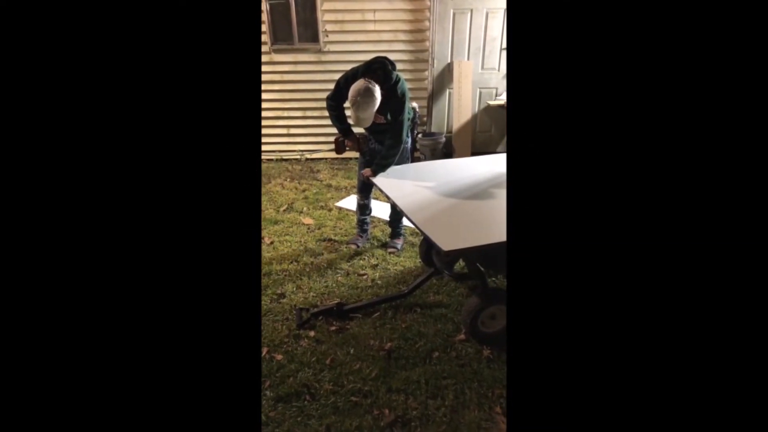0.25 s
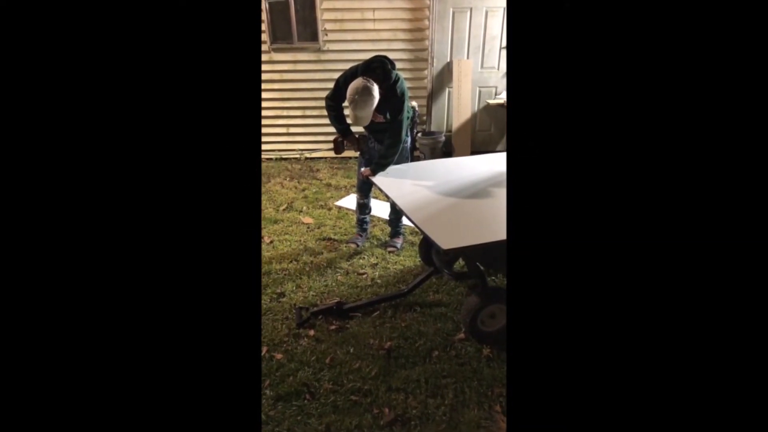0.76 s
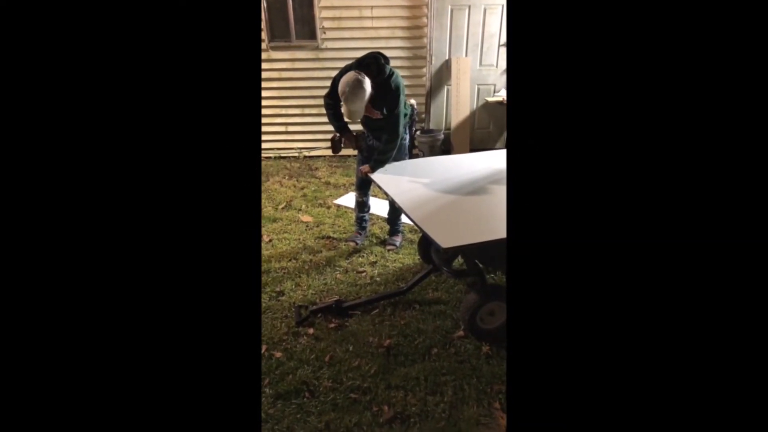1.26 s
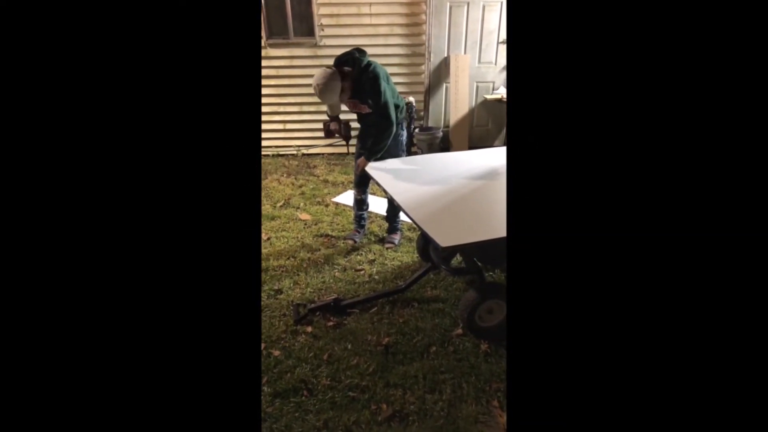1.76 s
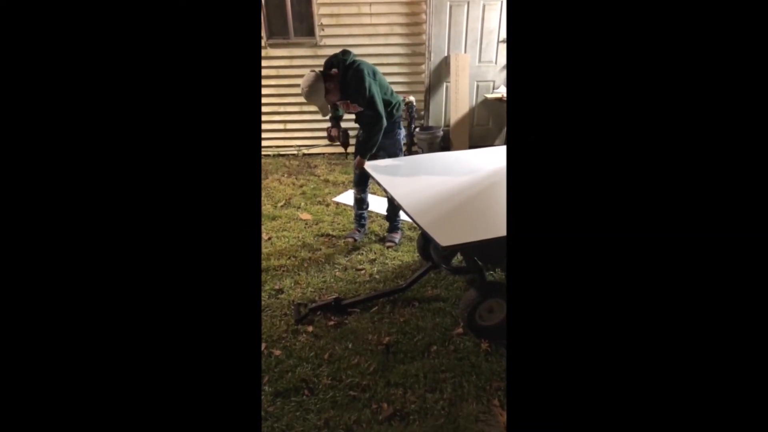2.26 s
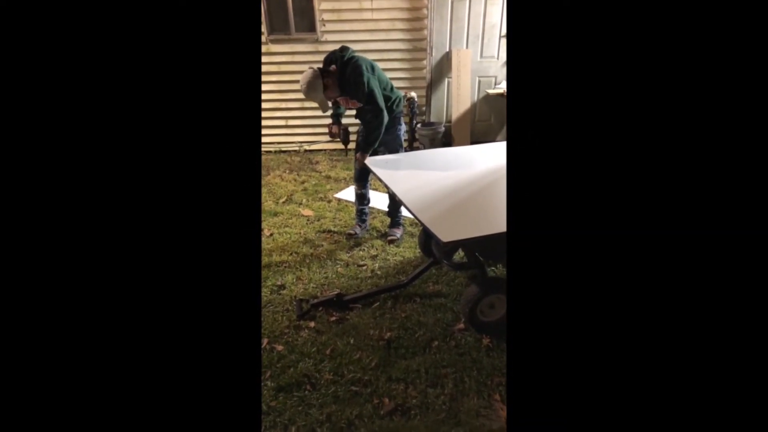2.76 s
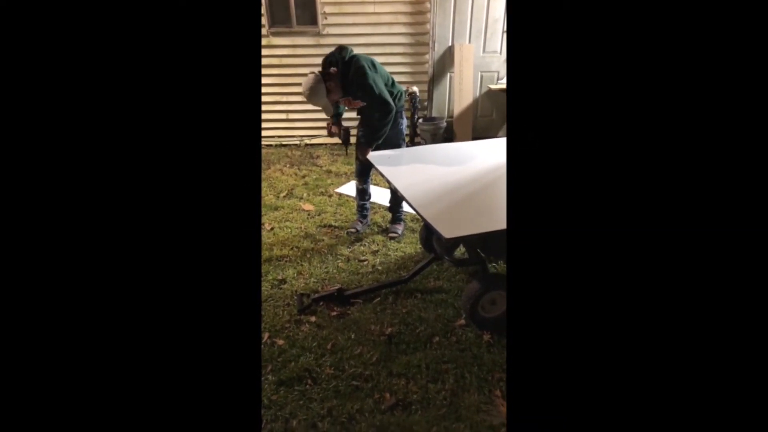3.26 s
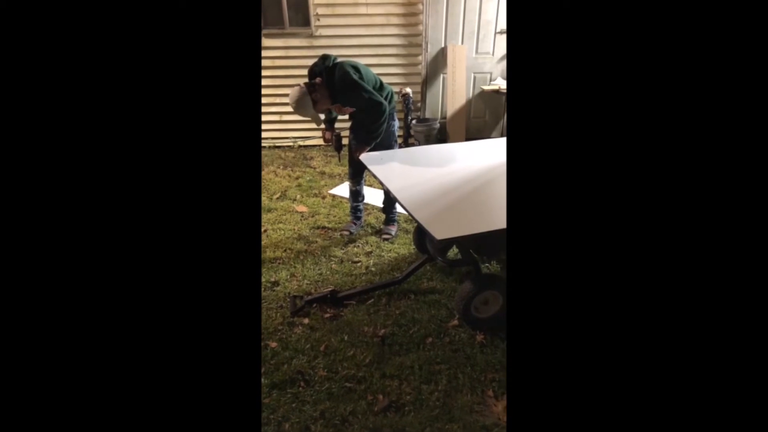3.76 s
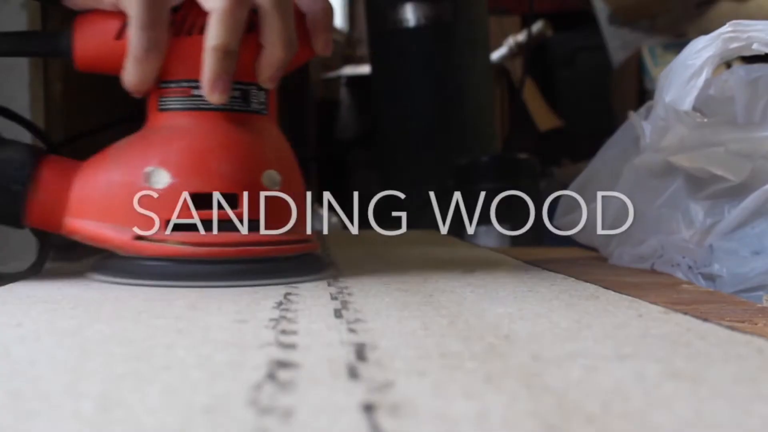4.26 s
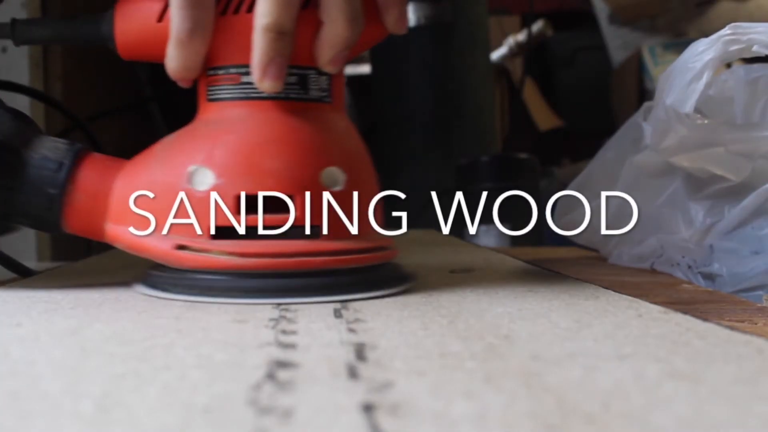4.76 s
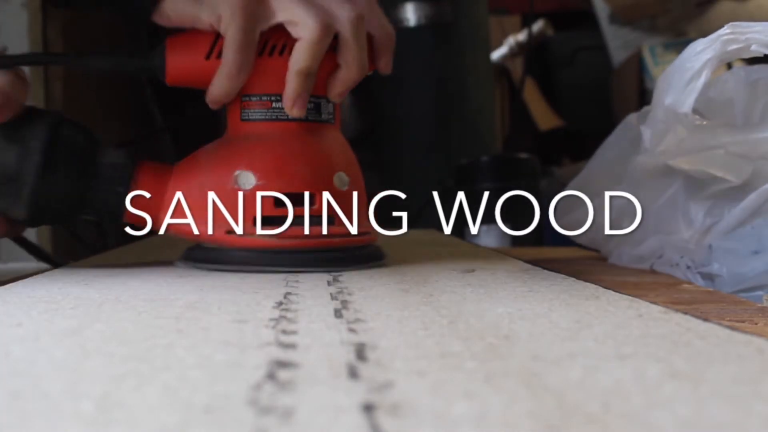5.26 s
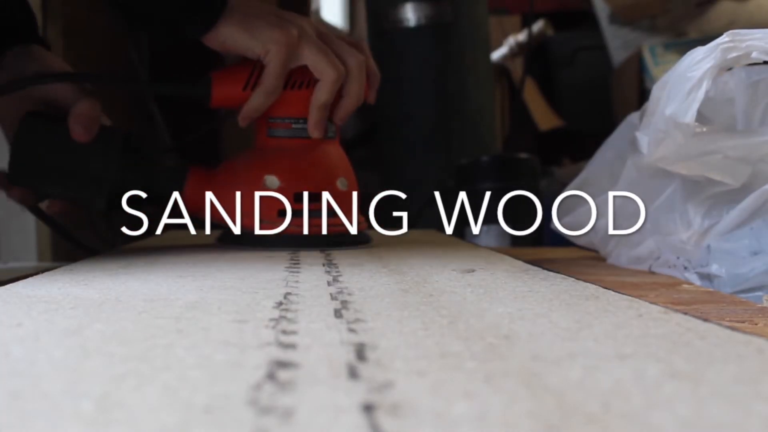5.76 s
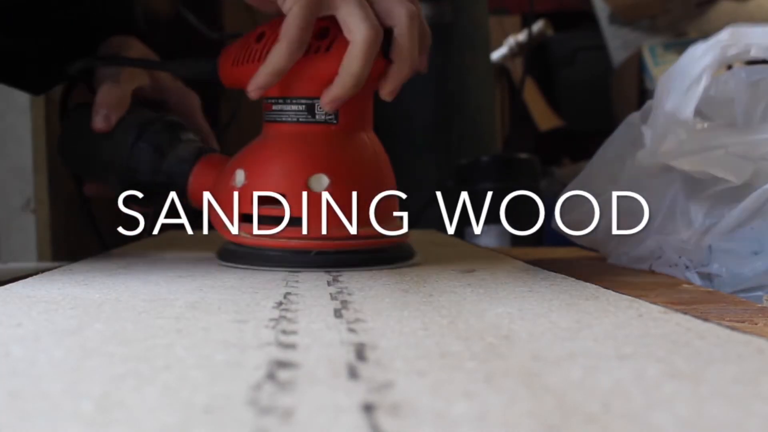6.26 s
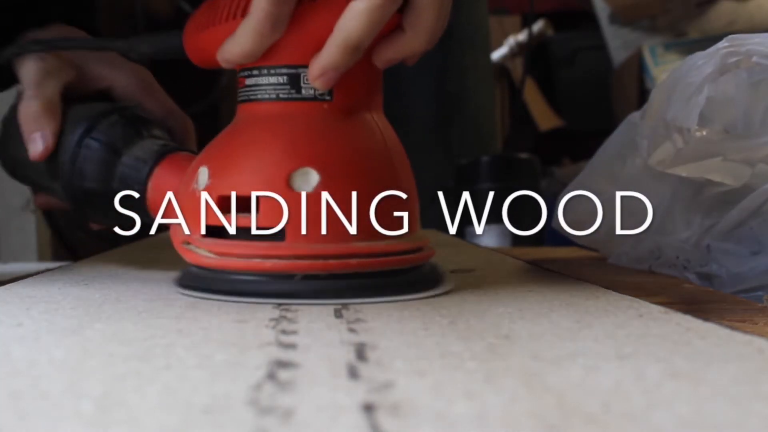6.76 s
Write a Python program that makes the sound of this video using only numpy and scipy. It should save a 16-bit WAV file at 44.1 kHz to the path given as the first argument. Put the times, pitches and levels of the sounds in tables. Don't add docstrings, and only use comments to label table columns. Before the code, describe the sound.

An impact driver whines up in a quiet yard, hammers a screw into a booming panel, stops; later a sander drones loudly up close.

```python
import sys
import numpy as np
from scipy import signal
from scipy.fft import rfft, irfft, next_fast_len
from scipy.io import wavfile
from scipy.ndimage import uniform_filter1d, map_coordinates

SR = 44100
rng = np.random.default_rng(int(sys.argv[2]) if len(sys.argv) > 2 else 0)


def output_pcm(signal):
    pcm = np.clip(np.atleast_2d(signal).T, -1, 1) * 32767
    wavfile.write(sys.argv[1], SR, np.round(pcm).astype(np.int16))


def ratio(d):
    e = np.asarray(d, float) / 20
    return 10 ** e


N = 308685
T = np.arange(N) / SR
CUT_S = 4.2415
# t/s, reach away from the microphone/0-1, turned to pull back/0-1, pressure/dB
STROKE = [(4.25, 0.05, 0, -0.5), (4.5, 0, 0, 2), (4.65, 0.33, 0, 1.5), (4.9, 0.18, 0.16, 0),
          (5.2, 0.35, 0, -1.5), (5.4, 0.37, 0.24, 2), (5.6, 0.63, 0.87, 0.2), (5.85, 0.92, 0.64, 2.5),
          (6.1, 0.94, 0.7, 0.6), (6.4, 0.48, 0.82, 1.5), (6.6, 0.5, 0.53, 1.5), (6.8, 0.54, 1, 0.5),
          (6.99, 0.57, 0.4, 0)]


def unit(x):
    return x / np.sqrt(np.mean(x ** 2) + 1e-20)


def bell(x):
    return np.exp(-.5 * x ** 2)


def along(points, hz):
    f, v = np.transpose(points)
    return np.interp(np.log(hz + 1), np.log(f + 1), v)


def curves(rows):
    s, *cols = np.transpose(rows)
    return [np.interp(T, s, c) for c in cols]


def moments(rows):
    return sum(db * bell((T - s) / width) for s, db, width in rows)


def law(near_db, reach_db, pull_db):
    reach, pull, _ = curves(STROKE)
    return near_db + reach_db * reach + pull_db * pull


def wobble(rate):
    return map_coordinates(rng.standard_normal(int(N * rate / SR) + 4), [T * rate])


def tone(turns, db):
    return np.sqrt(2) * ratio(db) * np.sin(2 * np.pi * turns)


def filtered(x, response):
    m = next_fast_len(N + SR // 2)
    return irfft(rfft(x, m) * response(np.fft.rfftfreq(m, 1 / SR)), m)[:N]


def resonances(modes):
    return lambda f: sum((-1) ** k * ratio(db) * 1j * f * w / (c * c - f * f + 1j * f * w)
                         for k, (c, w, db) in enumerate(modes))


def rush(spectrum, patchy_db):
    z = signal.stft(rng.standard_normal(N), nperseg=512)[2]
    field = uniform_filter1d(rng.standard_normal(z.shape), size=8, axis=0)
    field = uniform_filter1d(field, size=8, axis=1)
    x = signal.istft(z * ratio(patchy_db * unit(field)), nperseg=512)[1][:N]
    return unit(filtered(x, lambda hz: ratio(along(spectrum, hz))))


def dying(spectrum, t60, size):
    hz, t, z = signal.stft(rng.standard_normal(size), SR, nperseg=128)
    level_db = along(spectrum, hz)[:, None] - 60 * t / along(t60, hz)[:, None]
    x = signal.istft(z * ratio(level_db), SR, nperseg=128)[1]
    return x / np.linalg.norm(x)


def add(track, s, x):
    part = track[round(s * SR):][:len(x)]
    part += x[:len(part)]


def driving():
    # f/Hz, width/Hz, level/dB
    housing = [(1690, 140, -4.5), (3350, 360, -1), (5000, 302, 13.5), (5490, 300, 6), (9500, 1500, 2)]
    # f/Hz, level/dB
    whirr = [(60, -20.5), (130, -1.5), (330, -6.5), (550, -14), (780, -6), (1100, -13), (1500, -4.5),
             (1900, -9.5), (2400, -11), (4500, -9), (6500, -11), (9500, -11), (12000, -17), (16000, -10)]
    load_db = [-6, 6, -0.5]
    free_hz, sag_hz = 1730, 667
    trigger_s, spin_up_s, seated_s, sag_s = .46, 0.071, 0.97, .064
    late_db = -24
    teeth = 27.2

    t = np.clip(T, trigger_s - .03, seated_s + 0.022)
    late = np.exp((trigger_s - t) / spin_up_s)
    load = np.exp((t - seated_s) / sag_s)
    hz = free_hz * (1 - 0.6 * late) - sag_hz * load
    turns = np.cumsum(hz * (1 + 0.0033 * wobble(120))) / SR
    mesh_db = [db + late_db * late + gain * load for db, gain in zip([-57, -58.5, -56.5], load_db)]
    noise_db = -42 - 5.5 * late
    knock = np.exp(-(turns / teeth % 1) / 0.301)

    whine = np.zeros(N)
    for k, steady in enumerate((.45, .07, .25)):
        overtone_hz = (k + 1) * hz
        lift_db = 3.5 * sum(1 / (1 + ((overtone_hz - c) / w) ** 2) for c, w, _ in housing) + 0.5
        phase = (k + 1) * turns + (0.09 + .04 * k) * wobble(150)
        whine += tone(phase, mesh_db[k] + lift_db + 1.5 * wobble(27)) * unit(steady + knock)
    whine += tone(turns, mesh_db[0] - 10.5 + 3 * wobble(32.1))
    whine += tone(0.8 * turns, mesh_db[0] - 7.0 + 3 * wobble(30))
    whine += tone(turns / teeth + .1 * np.sin(40 * T), -60.5 + 3 * wobble(14))
    whistle_db = -55 + .6 * late_db * late - 22 * np.exp((t - seated_s) / .05)
    whine += tone(4.85 * np.cumsum(hz) / SR, whistle_db + 1.1 * wobble(40))

    rattling = unit(filtered(knock ** 2 * rng.standard_normal(N), resonances(housing)))
    noise = ratio(noise_db - 1.5) * rush(whirr, patchy_db=2.0) + ratio(noise_db - 12.0 + 5 * load) * rattling
    return (whine + noise) * np.interp(T, [.43, .465, .978, .995], [0, 1, 1, 0])


def panel_shaking():
    # t/s, level/dB
    effort = [
        (.965, -26),
        (.985, -5.5),
        (1.04, -4),
        (1.1, -0.5),
        (1.125, -7),
        (1.16, -3),
        (1.19, -22.5),
        (1.25, -35),
        (1.4, -46),
    ]
    # f/Hz, level/dB
    panel = [(90, -29.5), (130, -11), (185, 5.5), (245, -18), (310, -1), (400, -9.5), (560, -16),
             (800, -10.5), (1100, -15.5), (1400, -14), (2000, -21.5), (3500, -22.5), (7000, -67)]
    # f/Hz, level/dB
    rattle = [(900, -20.5), (1500, -5), (3000, -3), (5000, -6), (7000, -11.5), (10000, -11.5), (13000, -16),
              (16000, -19.5)]
    # f/Hz, width/Hz, level/dB
    panel_modes = [(183, 24, -1), (309, 28, -0.5)]
    boom_hz, boom_t60 = 77, 0.24

    effort_db, = curves(effort)
    started = T > effort[0][0]
    loose = ratio(-40.5 + 2.5 + 0.195 * effort_db) * rush(rattle, patchy_db=3.0)
    x = ratio(-24.5 + effort_db) * rush(panel, patchy_db=-1.5)
    x += loose * np.interp(T, [.966, .985, 1.15, 1.175], [0, 1, 1, 0])
    x *= np.interp(T, [.968, .982, 1.4, 1.5], [0, 1, 1, 0])
    push = tone(boom_hz * T, -23.5 + 1.85 * effort_db) * started
    x += filtered(push, resonances([(boom_hz, np.log(1000) / np.pi / boom_t60, 0)]))
    shake = ratio(-25 + 19.5 + effort_db) * rng.standard_normal(N) * started * (T < effort[-1][0])
    return x + filtered(shake, resonances(panel_modes))


def hammering():
    # t/s, peak level/dB, panel level/dB
    blows = [
        (0.9877, -14, -12.5),
        (1.0136, -14.5, -14.5),
        (1.0403, -13.5, -11.5),
        (1.067, -13, -13.5),
        (1.0948, -11.5, -11),
        (1.1306, -18, -3),
        (1.1462, -33.5, -7),
        (1.1607, -45, 3),
    ]
    # f/Hz, level/dB
    crack = [(2500, -28), (4500, -1.5), (8000, 1), (10000, 0.5), (12000, -5.5), (14000, -1), (16000, -19)]
    # f/Hz, level/dB
    strike = [(880, -23.5), (1500, -2), (2000, -11.5), (2300, -12), (2510, -7), (2720, -7.5), (4040, -11),
              (5070, -5.5), (6830, -22.5), (7760, -13.5), (12200, -22), (15100, -4.5), (16000, -22)]
    # f/Hz, t60/s
    steel_t60 = [(1500, 0.065), (5000, 0.032), (9000, 0.053), (15000, 0.02)]
    # f/Hz, level/dB
    thump = [(90, -29.5), (130, -11), (185, 5.5), (245, -18), (310, -1), (400, -9.5), (560, -16),
             (800, -10.5), (1100, -15.5), (1400, -14), (2000, -21.5), (3500, -22.5), (7000, -67)]

    x = panel_shaking()
    for s, db, panel_db in blows:
        ringing = dying(strike, steel_t60, size=4096)
        ringing *= 1 - np.exp(-np.arange(len(ringing)) / SR / .0006)
        rebound = dying(strike, steel_t60, size=4096)
        shaken = dying(thump, [(300, 0.033), (3000, 0.075)], size=8192)
        add(x, s + 0.0007, ratio(db + 7.5) * dying(crack, [(8000, 0.014)], size=1024))
        add(x, s + 0.00097, ratio(db + 15.0) * ringing)
        add(x, s + 0.0072, ratio(db + 6.0) * rebound)
        add(x, s + 0.00287, ratio(db + panel_db + 16.5) * shaken)
    t = np.arange(SR // 40) / SR
    for s, *_ in blows[1:5]:
        drift = 0.47 * np.cumsum(rng.standard_normal(len(t))) / 4
        swell = ratio(-20 - 60 * t / 0.015) * (1 - np.exp(-t / 0.0013))
        add(x, s - .0074, swell * np.sin(2 * np.pi * 5050 * t + drift))
    return x


def motor(turns):
    shaft_law = {1: (-18, -6.5, 0.1), 2: (-40.5, 3.6, 6.2), 3: (-37, 13.5, -12.5), 4: (-28.5, -10.5, -0.1),
                 12: (-32.5, 0.1, 4.7), 13: (-48, -1, 8.9)}
    order_swells = {2: [(4.9, 2.5, .1), (5.6, -1.5, 0.19), (5.98, 6, 0.012), (6.05, 4, 0.24),
                    (6.27, 4.5, 0.027), (6.65, 1, .06)], 3: [(4.3, 6, 0.058), (4.68, 2, .025),
                    (5.0, 6, .07), (5.4, -3, 0.13), (5.8, 0, .1), (6.15, 5, .1)], 4: [(4.27, 1.5, 0.044),
                    (4.82, 0, .1), (5.4, 4.5, 0.12), (5.7, 3.5, 0.091), (6.08, 4, 0.097), (6.75, 2, .1)]}
    # t/s, level/dB, half width/s
    shades = [(4.33, -6.5, 0.021), (4.38, 5, 0.012), (4.47, -4, 0.02), (4.6, -6, 0.052), (5.3, -7, 0.028),
              (5.455, -13, 0.018), (6.05, -28.5, 0.03), (6.16, -2.5, .05), (6.29, -2, 0.01),
              (6.58, 1.5, 0.012), (6.82, -13, 0.0059)]
    # t/s, level/dB, half width/s
    strain = [
        (4.97, 7.5, 0.26),
        (5.5, 8.5, 0.17),
        (5.83, 10, 0.081),
        (6.25, 13.5, 0.043),
        (6.47, 13, 0.065),
        (6.72, 11.5, 0.16),
    ]
    # t/s, level/dB, half width/s
    lower_fade = [
        (5.76, -15.5, 0.23),
        (4.4, 1, 0.032),
    ]

    db = {k: law(*row) + moments(order_swells.get(k, [])) for k, row in shaft_law.items()}
    bars_db = db[12] + moments(shades)
    upper_db = db[13] + moments(shades) + moments(strain)
    mains = 120 * T
    x = tone(turns, db[1] + .5 * wobble(25))
    x += tone(2 * turns, db[2] + 0.62 * wobble(6.9))
    x += tone(3 * turns, db[3] + 0.91 * wobble(16))
    x += tone(4 * turns, db[4] + 1.1 * wobble(20))
    x += tone(6 * turns, -46 + 0.74 * wobble(4.84))
    bars = 12 * turns + 0.022 * wobble(44)
    x += tone(bars, bars_db + 1.06 * wobble(30))
    x += tone(bars + mains, upper_db + 2.0 * wobble(25))
    x += tone(bars - mains, -41 + moments(lower_fade) + 2 * wobble(11))
    x += tone(2 * bars, bars_db - 22.5 + 2.3 * wobble(8.2))
    return x + tone(2 * bars - mains, bars_db - 22 + 2.8 * wobble(7.9))


def chatter(shaft, spin_hz):
    pad_law = {2: (-33.5, -1, 2.2), 3: (-26.5, -16.5, -6), 4: (-23, -14.5, 0.1), 6: (-39, 5, -0.81),
               8: (-39.5, 0.1, 0.1)}
    # overtone, level over the eighth/dB
    pad_top = [(9, -10.5), (11, -14), (12, -14.5), (14, -8.5), (15, -7), (18, -17), (23, -14.5), (26, -14)]
    # t/s, spins per order, spins more, spread/spins
    pad_lag = [(4.25, .9, .3, 1), (4.65, .9, .3, .9), (4.8, .85, .1, .6), (5.25, .85, 0, .6),
               (5.5, .9, -.3, .75), (5.9, 1.3, -3.7, 1), (6.15, 1.1, -1.5, .85), (6.45, .85, 0, .6),
               (6.7, .85, .1, .6), (6.99, .88, .1, .7)]
    strand_shift = {2: .6, 3: .05, 4: -.4, 6: .6}
    slap_start = {2: .11, 3: -.54, 4: -.71}
    own_bend = {2: .6, 3: -.06}
    # t/s, share, half width/s
    twin = [
        (4.8, .65, .3),
        (6.75, .35, .3),
    ]
    overtone_swells = {2: [(4.33, -8, .06), (4.65, 1, 0.039), (5.0, -3, .1), (5.5, -7, .12), (5.95, -9, 0.22),
                       (6.7, 0, .15)], 3: [(4.72, -5, .04), (5.1, 0.5, .2), (5.5, -2, 0.073), (6.5, -8, 0.22)],
                       4: [(4.9, 1, .15), (5.4, -3.5, .08), (5.65, -10, 0.16), (6.08, 1, 0.087), (6.77, 4.5, 0.084)],
                       5: [(4.73, -8, .05), (4.9, 6, .06), (5.47, 8.5, 0.046), (5.85, 3.5, 0.091), (6.2, 3, 0.056),
                       (6.63, -6, .06), (6.87, -4, .04), (6.98, 3, .03)]}
    # t/s, level/dB, half width/s
    rocks = [(4.7, 4, 0.057), (4.88, 1, 0.069), (5.05, -6, 0.017), (5.13, 4.5, 0.03), (5.27, 3.5, 0.046),
             (5.375, 8.5, 0.016), (5.45, -17, .04), (5.62, 0, .03), (5.8, 14, 0.03), (6.055, 13.5, 0.034),
             (6.13, 8, 0.01), (6.31, 6, 0.028), (6.4, -8, .03), (6.48, -1, .03), (6.55, 9.5, 0.024),
             (6.7, -3, 0.023), (6.79, 13, 0.023), (6.88, -10, 0.025)]
    # t/s, level/dB, half width/s
    grabs = [
        (4.675, 20.5, 0.015),
        (4.97, 6.5, 0.083),
        (5.27, 11, 0.029),
        (6.1, 14.5, 0.15),
        (6.78, 4, 0.092),
        (6.95, 20, 0.057),
    ]
    lag_share = .87
    skirt, skirt_wider = .2, 3.5

    loose_db = -15 * np.clip((4.5 + 0.19 - T) / 0.19, 0, 1)
    second_db, third_db, fourth_db, sixth_db, eighth_db = (law(*row) + loose_db for row in pad_law.values())
    flat_db, rock_db = moments(grabs), moments(rocks)
    eighth_db = eighth_db + rock_db
    low = {2: second_db, 3: third_db + flat_db, 4: fourth_db + 0.15 * flat_db, 5: sixth_db - 3.5,
           6: sixth_db, 7: eighth_db - 4.5, 8: eighth_db}
    spin = np.cumsum(spin_hz + 0.1547 * wobble(14)) / SR
    shop = T > CUT_S
    per_order, more, wide = (curve[shop] for curve in curves(pad_lag))

    x = np.zeros(N)
    for k, db in low.items():
        lag = np.arange(-3, k + 4)[:, None]
        off = (lag - (k * per_order + more + strand_shift.get(k, 0))) / wide
        share = bell(off) + skirt * bell(off / skirt_wider)
        if k == 4:
            share += moments(twin)[shop] * np.exp(-.5 * (off - 2 / wide) ** 2 * 3)
        share *= lag != 0
        start = slap_start.get(k, rng.random()) + own_bend.get(k, .21) * (lag - round(lag_share * k)) ** 2
        slipping = k * shaft + 0.021 * k * wobble(30)
        level_db = db + moments(overtone_swells.get(k, [])) + 1.5 * wobble(24)
        strands = tone(slipping[shop] - lag * spin[shop] + start, level_db[shop])
        x[shop] += (share * strands).sum(axis=0) / np.sqrt((share ** 2).sum(axis=0))

    order, over_db = np.transpose(pad_top)
    top_db = eighth_db - (1 - .45) * rock_db + 3.0
    for k in range(9, 27):
        slap = k * shaft - round(lag_share * k) * spin + 0.011 * k * wobble(30) + rng.random()
        swell = 1 + .3 * np.cos(2 * np.pi * (spin + rng.random()))
        x += tone(slap, top_db + np.interp(k, order, over_db) + 2.0 * wobble(24)) * swell
    return x


def sander():
    # t/s, shaft f/Hz, free spin of the pad f/Hz
    speed = [(4.25, 191.5, 2.6), (4.47, 185.2, 4.3), (4.72, 176.9, 4.75), (4.97, 172.9, 4.65),
             (5.22, 170.7, 4.6), (5.48, 169.4, 4.4), (5.72, 168.7, 4.05), (5.98, 168.5, 3.85),
             (6.22, 169.1, 3.9), (6.48, 170.2, 4.15), (6.72, 171.2, 4.3), (6.99, 171.7, 4.3)]
    noise_law = {"board": (-28.5, -1.05, -0.1), "grit": (-33.5, 1, 2.1), "fan": (-32.5, 1, 0.68)}
    # f/Hz, level/dB
    board = [(30, -80), (70, -55), (110, -33), (230, -13), (300, -6.5), (370, 2.5), (410, -0.5),
             (450, -1.5), (600, 2), (900, -4.5), (1500, -6.5), (1900, -19.5), (3000, -17.5), (5000, -71)]
    # f/Hz, level/dB
    grit = [(1060, -65), (1800, -5.5), (1930, -12), (1980, -2), (2090, -3), (2300, -3), (2980, -9),
            (6500, -14.5), (8450, -21), (14300, -120)]
    # f/Hz, level/dB
    fan = [(2650, -5), (4500, -4), (5330, -3.5), (8290, 0), (10300, -2.5), (12500, -11.5), (14400, -20.5),
           (15400, -30.5), (16000, -48)]
    # f/Hz, level/dB
    settle = [(30, -24), (70, 0.5), (110, -8), (200, 0), (300, -8), (420, -7), (600, -7), (1200, -37)]
    # t/s, peak level/dB
    bumps = [
        (4.29, -33),
        (4.529, -48),
        (4.609, -49.5),
        (5.39, -34),
        (5.989, -44),
        (6.488, -46),
        (6.839, -45),
        (6.979, -48),
    ]
    # t/s, peak level/dB, t60/s
    scuffs = [(4.2867, -21.5, .02), (4.298, -17, .02), (4.36, -20, 0.027), (4.4194, -16.5, 0.0177),
              (4.473, -16.5, 0.029), (4.517, -16, .035), (4.523, -17, .025), (4.593, -20, .04),
              (4.601, -17, 0.028), (4.7118, -17, .03), (6.3496, -22, .03), (6.475, -16.5, .03),
              (6.515, -20, .03), (6.6194, -22, .03)]

    hz, spin_hz = curves(speed)
    turns = np.cumsum(hz) / SR
    board_db, grit_db, fan_db = (law(*row) for row in noise_law.values())
    hand_db = curves(STROKE)[2]
    press = wobble(12)
    orbit = np.cos(2 * np.pi * turns) + 0.13 * np.cos(4 * np.pi * turns)

    board_db = board_db + 0.96 * hand_db + 0.35 * press + 0.45 * wobble(7.2)
    grit_db = grit_db + hand_db + 0.43 * press + 0.89 * wobble(16)
    fan_db = fan_db + 0.37 * hand_db + 0.2 * press + 0.7 * wobble(90) + 0.3 * wobble(9)
    x = ratio(board_db) * rush(board, patchy_db=0.5)
    x += ratio(grit_db) * unit((1 + 0.048 * orbit) * rush(grit, patchy_db=2.0))
    x += ratio(fan_db) * unit((1 + 0.17 * orbit) * rush(fan, patchy_db=1.1))
    shudder_db = -29.5 - 120 * np.clip(T - 4.47, 0, 1) + 2.8 * wobble(25.1)
    x += ratio(shudder_db) * rush(settle, patchy_db=-3.5)
    x += tone(409.3 * T + 0.27 * wobble(30), law(-37, -8.5, 0) + 2.2 * wobble(15))

    t = np.arange(SR // 8) / SR
    for s, db in bumps:
        thud = ratio(db + 13.5 - 60 * t / 0.046) * (1 - np.exp(-t / 0.0029)) * np.sin(2 * np.pi * 78 * t)
        add(x, s, thud)
        add(x, s, ratio(db + 28) * dying(settle, [(300, 0.072)], size=4096))
    for s, db, t60 in scuffs:
        add(x, s, ratio(db + 12.0) * dying(fan, [(8000, t60)], size=4096))
    x += motor(turns) + chatter(turns, spin_hz)
    return filtered(x, lambda f: np.clip((15450 - f) / 200 + 1, 0, 1))


def footsteps():
    # t/s, peak level/dB, t60/s
    steps = [
        (2.9, -75, 0.476),
        (3.18, -80.5, 1.4),
        (3.55, -59, 0.34),
        (3.67, -71.5, 3.9),
        (4.05, -80, 3.4),
    ]
    # f/Hz, level/dB
    grass = [(1200, -1.5), (2500, 3), (3300, -4), (4600, -1), (7000, -12), (11500, -19), (13000, -30),
             (16000, -45)]
    swish = np.zeros(N)
    for s, db, t60 in steps:
        swish += ratio(db - 60 * np.abs(T - s) / t60) * (1 - np.exp(-np.clip(T - s, 0, None) / 0.01))
    return swish * ratio(1.23 * wobble(90)) * rush(grass, patchy_db=3.5)


def clicks_and_rustles():
    # t/s, peak level/dB, f/Hz
    clicks = [(0.2543, -56.5, 3350), (0.3994, -61, 3870), (0.4199, -62, 7900), (0.4234, -54.5, 3950),
              (0.4574, -40, 5300), (1.4586, -51.5, 4550), (2.4404, -55, 3450), (2.4410, -60, 4800),
              (3.255, -57, 2400), (1.43, -62, 75), (3.27, -62.5, 72)]
    # t/s, peak level/dB, f/Hz
    leaves = [(0.0394, -76, 8150), (0.2339, -61, 12500), (1.4581, -55, 8630), (1.5244, -65, 9800),
              (1.6394, -73, 9680), (1.9555, -63, 13100), (1.9849, -63, 12400), (2.0023, -62, 12700),
              (2.6728, -62, 11400), (2.9223, -59, 11500), (3.2196, -58.5, 11500), (3.3294, -65, 8800),
              (3.5553, -67, 12200)]
    x = np.zeros(N)
    for rows, t60 in (clicks, .028), (leaves, .07):
        for s, db, hz in rows:
            colour = [(hz / 5, -16), (hz / 1.4, -6), (hz, 0), (hz * 1.19, -6), (hz * 3, -24)]
            add(x, s, ratio(db + 13.0) * dying(colour, [(1000, t60)], size=4096))
    return x


def evening():
    # f/Hz, level/dB
    drones = [(118.4, -64.5), (140.0, -59.5), (177.6, -60.5), (242.2, -61), (323, -77), (360.7, -69),
              (559.9, -75), (597.5, -77.5), (721.4, -75.5), (1491, -80)]
    # f/Hz, level/dB, t/s, half width/s
    far_whine = (1020, -77, 3.97, .13)
    # f/Hz, level/dB
    hum = [(15, -54), (25, -27), (59, -4), (91, -3), (180, -4.5), (205, -6), (241, -10), (368, -8.5),
           (392, -14), (570, -18.5), (1200, -42), (1560, -57.5), (2640, -120)]
    # f/Hz, level/dB
    air = [(410, -37.5), (700, -3), (871, -8.5), (1080, -9), (1180, -7.5), (1520, -7), (1640, -11.5),
           (2020, -12), (2670, -18), (3510, -16.5), (6470, -26.5), (9920, -32.5), (11000, -31.5),
           (14300, -57.5), (22000, -120)]
    x = sum(tone(hz * T + 0.1095 * wobble(5), db - 5.0 + 2 * wobble(7.1)) for hz, db in drones)
    hz, db, s, width = far_whine
    x += tone(hz * T + .25 * wobble(30), db) * bell((T - s) / width)
    x += ratio(-59.5 + .7 * wobble(3.4)) * rush(hum, patchy_db=0.3)
    return x + ratio(-69 + 0.51 * wobble(1.0)) * rush(air, patchy_db=1.5)


def scene():
    # f/Hz, t60/s
    yard_t60 = [(100, 0.42), (2000, 0.59), (8000, 0.41), (15000, 0.19)]
    near = driving() + hammering() + footsteps() + clicks_and_rustles()
    walls = np.pad(dying([(100, 4.1), (15000, 1)], yard_t60, size=32768), (700, 0))
    yard = near + ratio(-20.5) * signal.fftconvolve(near, walls)[:N] + evening()
    shop = np.clip((T - CUT_S) / 0.00068, 0, 1)
    return ((1 - shop) * yard + shop * sander())[None]


def top_cut(x):
    return signal.sosfilt(signal.butter(12, 16520, fs=SR, output="sos"), x)


def record(dry):
    def microphone(hz):
        return np.clip((15830 - hz) / 250, 0, 1) * (1j * hz / (45 + 1j * hz)) ** 2
    return top_cut(filtered(dry[0], microphone)[None])


dry = scene()
out = record(dry)
output_pcm(out)
```